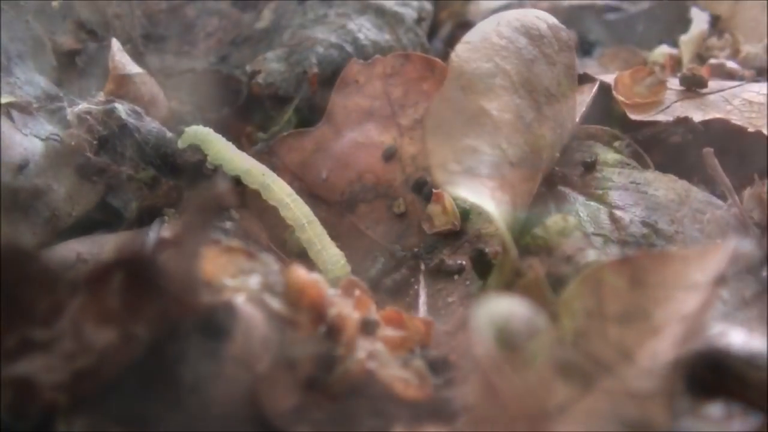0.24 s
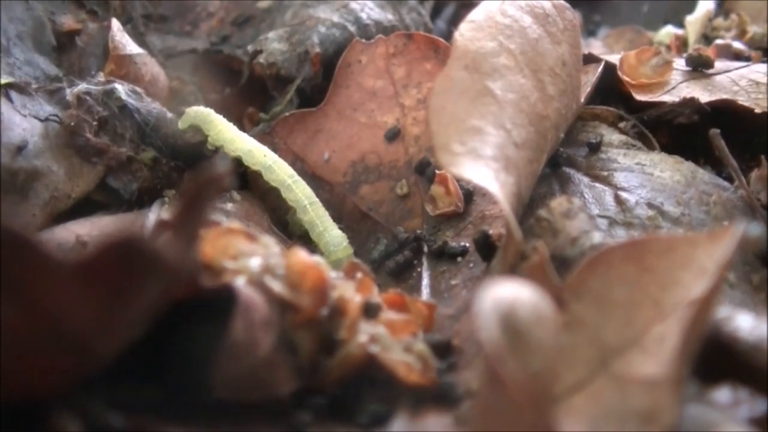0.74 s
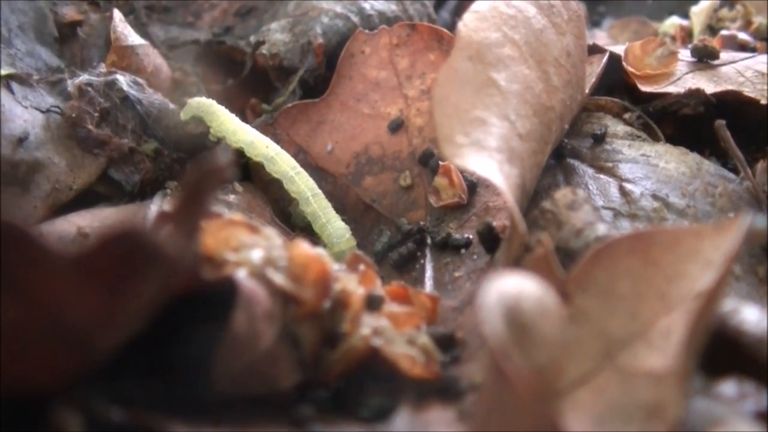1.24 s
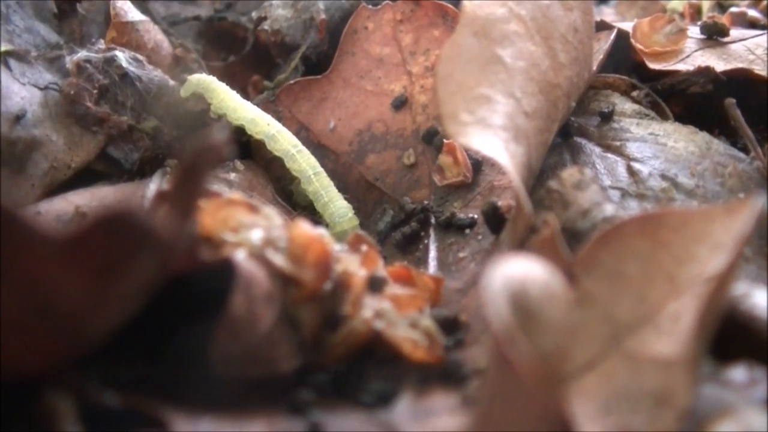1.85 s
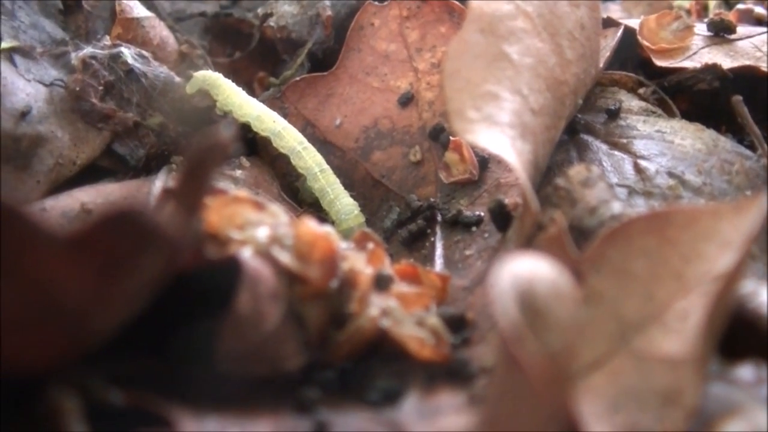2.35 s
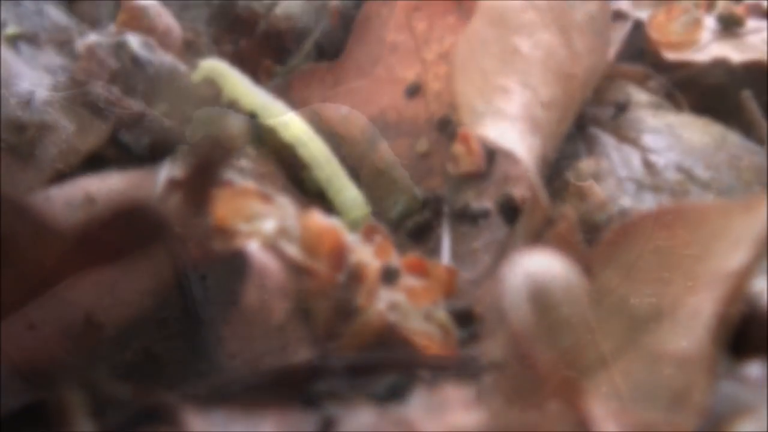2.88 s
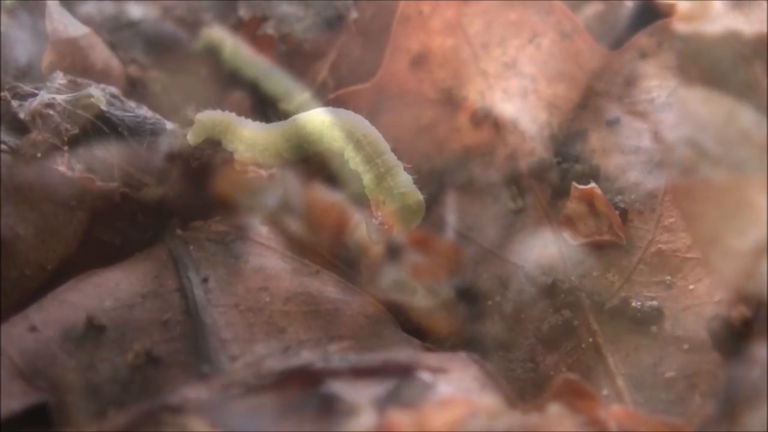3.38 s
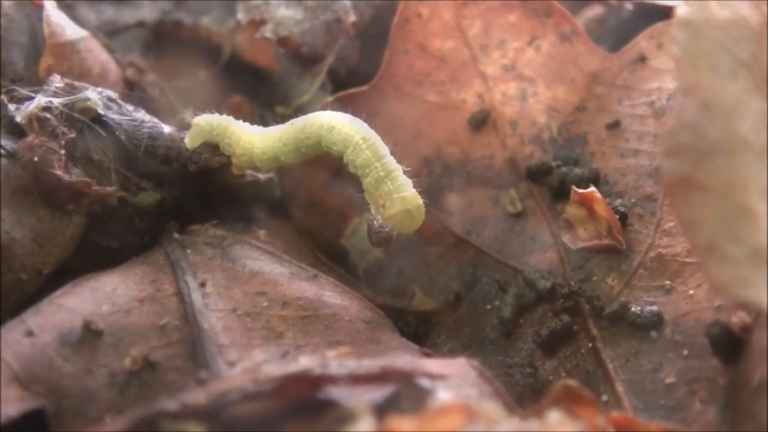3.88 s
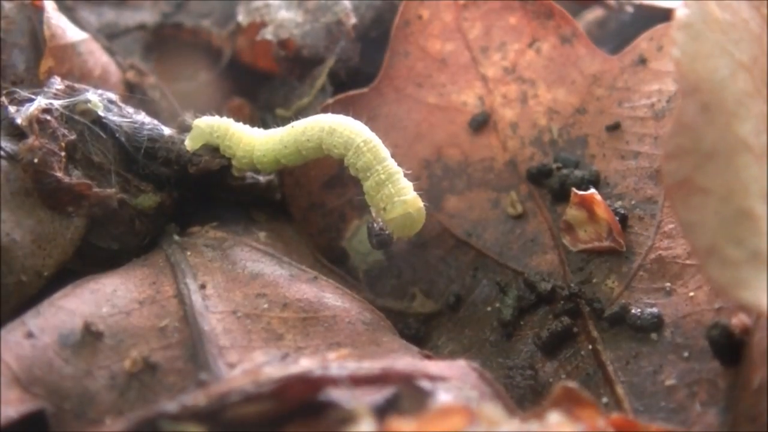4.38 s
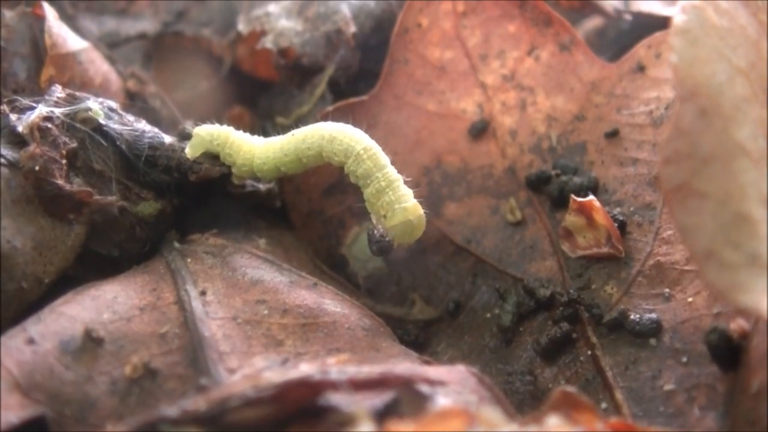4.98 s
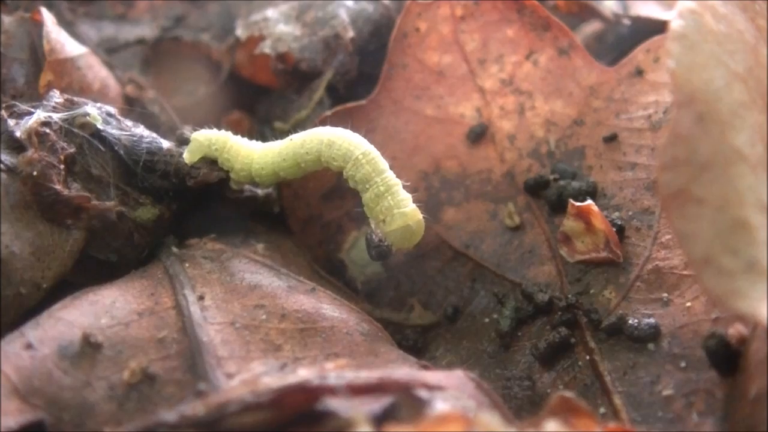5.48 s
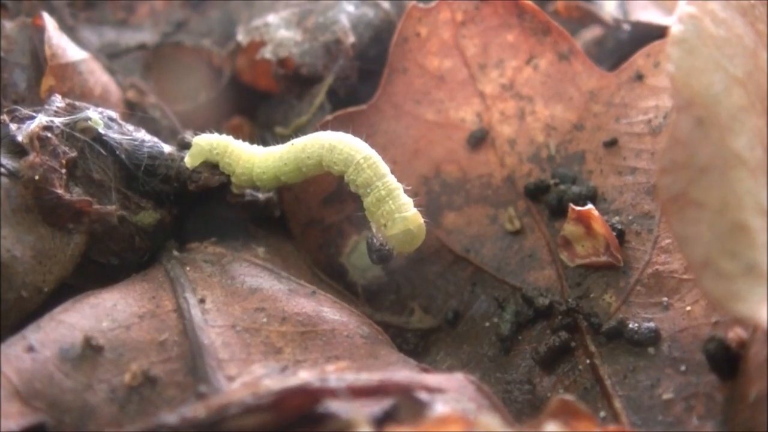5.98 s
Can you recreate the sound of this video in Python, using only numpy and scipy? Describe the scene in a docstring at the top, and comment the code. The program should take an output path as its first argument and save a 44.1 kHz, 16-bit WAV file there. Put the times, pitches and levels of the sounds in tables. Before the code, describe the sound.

Close, crisp ticks and snaps dot a quiet forest floor as small pellets land on dead leaves. They come several a second at first, peak in a few loud cracks midway, and grow sparse toward the end. Behind them are a light patter, a faint leafy rustle and distant birds, whose brief high chirps and whistles echo softly among the trees.

```python
"""Caterpillar droppings on dry leaves

Pellets fall from the canopy and tick on the leaf litter close to a camera microphone. Each rings
one leaf for a few milliseconds; the nearest overload the input. Farther off, a bird repeats a thin
call and others whistle, smeared by the forest, over a faint rustle."""
import sys
import numpy as np
from scipy import signal
from scipy.fft import rfft, irfft
from scipy.io import wavfile
from scipy.ndimage import uniform_filter1d

SR = 44100
rng = np.random.default_rng(int(sys.argv[2]) if len(sys.argv) > 2 else 0)


def master(y):
    """Save y as 16-bit WAV."""
    cut = np.clip(np.atleast_2d(y).T, -1, 1)
    pcm = np.round(cut * 32767)  # scale
    wavfile.write(sys.argv[1], SR, pcm.astype(np.int16))


N = 274729
TIME = np.arange(N) / SR

# how much the litter stirs, riding the rustle, far patter and crackle: t/s, level/dB
LITTER_STIR = [(0, -56), (.6, -52.5), (.85, -53), (.875, -60.5), (1.1, -60.5), (1.3, -55.5), (2.05, -55.5),
               (2.42, -61.5), (2.52, -56), (2.63, -53.5), (2.69, -58), (2.78, -50), (3.2, -54), (3.95, -50),
               (4.22, -52), (4.3, -57.5), (5.1, -61), (6.23, -60.5)]


def near_pellets(crunch_max_s=0.0021, punch_db=8, size=256):
    """A pellet strikes the modes of one leaf: light ones crunch first, hard ones punch straight through."""
    # hits: t/s, strength/dB, leaf ring f/Hz, ring Q, curl/dB, flex/dB, crack/dB, left-right/dB
    # (curl, flex and crack are relative to the ring)
    hits = [(.286, -9, 5970, 5.5, -13, -34, -29, 0), (.3215, -16.5, 6500, 1.5, 8.5, -8, 6, 5),
            (0.3283, -0.5, 4430, 2.2, 2, -15.5, -4, 2.5), (0.4143, -6.5, 4000, 2.4, -8, -34, -3.5, 1),
            (.5361, -8.5, 3640, 1.24, -15, -14, -16, -2), (0.6206, 2, 3530, 3.7, -8.5, -38, -22, 0),
            (0.7, -13, 6700, 0.69, -16, -13, -6, 2), (0.7535, -3, 4500, 2.6, 2, -6, -8, -3.5),
            (1.1363, -10, 5500, 4.5, 10, -5.5, -21, 5), (1.168, -18, 6490, 0.97, -22, -5, 2, -2),
            (1.1784, -4.5, 3860, 3.4, -12, -27, -31, 0), (1.216, -7, 6200, 5.3, -6, -25, -6.5, -2),
            (1.2386, -6.5, 3450, 1.9, 5, -10.5, -28, 8), (1.2714, -8, 5150, 4.2, 7, -9, -28, 6),
            (1.4197, 4.5, 5000, 3.2, 1.5, -14.5, -27, 6), (1.4805, 2, 5130, 2.2, -5.5, -14, -32, 4),
            (1.6047, -7.5, 5530, 4, -1.5, -8.5, -6.5, -1), (1.6907, -12, 3720, 1.8, -1, -6.5, -2, -3),
            (1.7344, -11, 5400, 0.62, -15, -31, -31, 1), (1.8422, -4.5, 6350, 2.3, -2.5, -21, -2.5, 1.5),
            (1.8574, -6.5, 5730, 1.2, 1, -10.5, -19, -3), (1.8783, -14, 6600, 0.67, -16, -23, -26, -2),
            (1.923, -11, 4180, 1.6, 2, -13, 2, -2.5), (1.9705, 12, 2800, 1.02, -1.5, -18.5, -0.5, -1.5),
            (2.0299, 0.5, 3740, 0.83, 0, -7.5, -5, -3.5), (2.061, -10, 4670, 0.98, -16, -24, -28, 3),
            (2.506, -2.5, 4040, 0.67, -19, -22, -36, .5), (2.5261, -6, 8140, 1.3, -9, -22, -10, -1),
            (2.59, -6, 4070, 3.8, -11, -20, -11, 1), (2.6482, -9, 4180, 4.5, -15, -13, -9.5, 3),
            (2.8013, 18, 4140, 1.7, -6, -5.5, -4.5, 0.5), (2.863, 2, 2800, 0.39, -17, -0.5, 4, 1.5),
            (2.8906, 22, 4330, 2.94, -6, -9, -12.5, 1), (2.9298, -3, 8300, 2.1, -12, -27, -25, -5),
            (3.0408, -4, 4640, 2.3, 0, -16, -33, 2), (3.1011, -2.5, 5950, 1.4, -6, -5.5, 0, -2.5),
            (3.105, -4.5, 5950, 1.35, 2.5, 7, 2.5, -2.5), (3.1745, -8.5, 6400, 0.99, -6.5, -5, -32, -3),
            (3.3483, -6.5, 3350, 2.4, 6, -15, -14.5, -1), (3.5326, 24, 4420, 3.6, -9, -10, -21.5, 1),
            (3.5755, 8, 4850, 2.5, -14, -5.5, -37, 0.5), (3.6024, -6.5, 5460, 4.7, -10, -12, -14, -4),
            (3.7114, 5.5, 4400, 2.3, -6.5, -5.5, -38, -1), (3.7234, 13, 4200, 4.3, -10, -12, -25, 1),
            (3.7689, -16.5, 5010, 3.5, 3, 9, -11, -1), (3.8902, -14, 3040, 2.6, 2, 1.5, 2, -3),
            (3.9595, -3.5, 7500, 1.1, -5.5, -25, -26, 1), (3.9905, -11.5, 3200, 1.3, -13, -2, -28, -2),
            (4.0193, -9, 4630, 0.67, -6, -3, -31, 3), (4.182, -5, 6160, 1.5, -4, -7, -42, 0),
            (4.284, -20.5, 4400, 1.6, -7, 14, -6, 0), (4.7657, -10, 5570, 4, -8.5, -9, -27, 2),
            (4.864, -3, 3900, 1.66, -27, -15, -17.5, 0), (5.331, -12.5, 4230, 2.6, -16, -20, -5.5, -1),
            (5.4052, -11.5, 3700, 3.3, -7, -5, -25, -2), (5.7611, 7.5, 3210, 2.2, -22, -16, -11, .5),
            (5.8211, 3, 3700, 1.8, -6.5, -2, -8, 1.5), (6.1198, -18, 5700, .76, -18, -14, 4.5, -1)]
    curl, flex = mode(hz=2374, q=1.92), mode(hz=733, q=0.77)  # modes that all leaves share
    crack, snap = mode(hz=9370, q=4), mode(hz=13400, q=4)
    soft_contact = signal.butter(2, (170, 10500), "bandpass", fs=SR, output="sos")  # soft pellet, small leaf
    lead_s = np.arange(size)[::-1] / SR  # time left until the blow
    out = np.zeros((2, N))
    for start, db, ring_hz, q, curl_db, flex_db, crack_db, pan_db in hits:
        leaf = mode(ring_hz, q) + amp(curl_db) * curl - amp(flex_db) * flex  # blade swings against curl
        leaf = signal.sosfilt(soft_contact, leaf) + amp(crack_db) * crack
        leaf += amp(crack_db - 19.5 + 0.99 * (db + flex_db)) * snap  # harder blows are shorter, so brighter
        crunch_s = crunch_max_s / (1 + amp(db - punch_db))
        blow = 35 * crunch_s * rng.standard_normal(size) * (lead_s < crunch_s)  # longer crunch, more weight
        blow[-1] = 1
        tick = signal.fftconvolve(leaf, blow / np.linalg.norm(blow))
        tick = among_leaves(tick, near_db=-10.5, near_t60=0.0089, far_db=-17.5, far_t60=0.043)
        add(out, start - lead_s[0], amp(db) * panned(tick, pan_db))
    return out


def far_patter(per_s=85, relative_db=-8.5, leaves=24):
    """Far pellets on many different leaves, dulled by distance, louder where the litter stirs."""
    out = np.zeros((2, N))
    for pitch, body, side in rng.random((leaves, 3)):
        leaf = mode(hz=2900 * 2.1 ** pitch, q=3.0) + 0.28 * body * mode(hz=900 * 2.5 ** body, q=1.5)
        tick = among_leaves(leaf, near_db=-14, near_t60=0.008, far_db=-10, far_t60=0.05)
        out += sprinkle(panned(tick, db=8 * (side - 0.5)), per_s / leaves, spread_db=6)
    return amp(relative_db) * unit(out) * envelope(LITTER_STIR)


def crackle(per_s=40, relative_db=-14.5):
    """Tiny brittle snaps, crowding together where the litter stirs most."""
    stir = envelope(LITTER_STIR)
    snap = among_leaves(mode(hz=9400, q=2.8), near_db=-9, near_t60=0.0069, far_db=-14, far_t60=0.05)
    snaps = sprinkle(snap, per_s * unit(stir), spread_db=5.5)
    return amp(relative_db) * unit(snaps) * stir


def settling_leaves():
    """Loose leaves settle with soft, low knocks."""
    # knocks: t/s, level/dB, f/Hz
    knocks = [(0.633, -13, 304), (.84, -9.5, 200), (2.518, -11, 328), (2.589, -9.5, 265), (2.65, -7.5, 255),
              (3.878, -13.5, 220), (4.227, -7, 413), (4.414, -12, 332), (4.581, -10, 380), (5.336, -9, 260),
              (5.431, -10, 350)]
    muffle = signal.butter(4, 650, fs=SR, output="sos")
    out = np.zeros((2, N))
    for start, db, hz in knocks:
        knock = signal.sosfilt(muffle, mode(hz, q=0.42))
        add(out, start, amp(db) * among_leaves(knock, near_db=-5, near_t60=0.11, far_db=0, far_t60=0.055))
    return out


def calling_bird():
    """A thin, raspy tone flicks up and slides down, with faint partials at 0.5 and 1.5 times its pitch."""
    # calls: t/s, level/dB, top f/Hz
    calls = [(.178, -44, 4723), (1.247, -43.5, 4900), (2.235, -44, 4894), (2.28, -49.5, 4905),
             (2.845, -47, 4750), (2.93, -43, 4797), (3.763, -49.5, 4660), (3.815, -45.5, 4970),
             (3.9, -44, 4920), (4.475, -45.5, 4936), (5.556, -42.5, 4970)]
    # pitch arch of one call: t/s, share of the top pitch
    arch_points = [(0, .83), (.005, .96), (.01, 1), (.018, .99), (.025, .93), (.033, .82), (.042, .62)]
    t = np.arange(0, arch_points[-1][0], 1 / SR)
    arch = np.interp(t, *np.transpose(arch_points))
    swell = arch ** 2 * signal.windows.tukey(len(t), 0.2)  # loudest at the top of the arch
    voice = np.zeros(N)
    for start, db, top_hz in calls:
        rasp = 0.036 * abs(waver(len(t), size=45))  # quick, uneven sags in pitch
        phase = 2 * np.pi * np.cumsum(top_hz * arch * (1.035 - rasp)) / SR
        partials = amp(-17.5) * np.sin(0.5 * phase) + amp(-16) * np.sin(1.5 * phase)
        tone = np.sin(phase) + partials * waver(len(t), size=70)
        add(voice, start, amp(db) * unit(tone * swell))
    return forest_reverb(voice, direct_db=-9)


def whistling_birds(held_buzz=0.0017, buzz_per_slide=0.26):
    """Glides from deep among the trees: held notes are pure, slurred ones buzz."""
    # notes: t/s, length/s, start f/Hz, end f/Hz, level/dB
    notes = [(0, 0.028, 4030, 3730, -54), (0, 0.25, 3364, 3442, -61.5), (.08, 0.069, 7930, 7380, -61.5),
             (0.391, 0.11, 3396, 3320, -55.5), (.413, .17, 5200, 4850, -62.5), (.6, .067, 4580, 4480, -57),
             (.667, 0.058, 3456, 3336, -51.5), (0.902, 0.024, 5140, 5090, -54.5),
             (1.026, .11, 3380, 3600, -66), (1.18, 0.18, 3100, 3267, -57.5), (3.15, 0.13, 4530, 4770, -54),
             (3.279, 0.03, 3430, 3370, -51), (3.31, 0.13, 4820, 3630, -55), (3.875, 0.1, 3640, 3663, -52),
             (4.06, 0.057, 3652, 3656, -52), (4.098, 0.037, 3287, 3215, -51.5),
             (4.203, .095, 6740, 7100, -63.5), (4.227, .043, 2737, 2550, -61),
             (4.344, 0.12, 4080, 3840, -63.5), (4.514, 0.1, 7100, 6470, -58.5),
             (4.926, 0.089, 4080, 3760, -63.5), (5.051, 0.063, 3410, 3230, -65.5),
             (5.122, 0.19, 2907, 2880, -69.5), (5.659, .27, 3456, 3490, -64.5),
             (5.983, 0.06, 3420, 3125, -60.5)]
    voice = np.zeros(N)
    for start, length_s, start_hz, end_hz, db in notes:
        length = round(length_s * SR)
        buzz = held_buzz + buzz_per_slide * abs(end_hz / start_hz - 1)
        wobble = waver(length, size=90) + waver(length, size=400)
        hz = np.linspace(start_hz, end_hz, length) * (1 + buzz * wobble)
        husky_flutter = 1 + 0.4 * waver(length, size=60)
        note = np.sin(2 * np.pi * np.cumsum(hz) / SR) * husky_flutter
        add(voice, start, amp(db) * unit(note * signal.windows.tukey(length, 0.3)))
    return forest_reverb(voice, direct_db=-6, decay_speed=1.47)


def rustle(flicker_db=3):
    """The stirring litter gives a faint, flickering wash."""
    # colour of the rustle: f/Hz, density/dB
    colour = [(60, -11), (200, 9), (500, 6.5), (1200, 1), (2500, 0.5), (4500, 2), (7000, -3.5),
              (10000, -11.5), (12500, -19), (16000, -26)]
    return stereo_noise(colour) * envelope(LITTER_STIR) * amp(flicker_db * waver(N, size=300))


def hiss(peak_s=0.856, peak_db=-40.5, swell_db_per_s=164, cut_db_per_s=4400):
    """One bright hiss swells and stops short."""
    # colour of the hiss: f/Hz, density/dB
    colour = [(200, -1), (1500, -1), (4200, 12), (7000, 1), (10500, 3.5), (12200, -5), (16000, -20)]
    since = TIME - peak_s
    return stereo_noise(colour) * amp(peak_db + np.minimum(swell_db_per_s * since, -cut_db_per_s * since))


def still_air(db=-59.5):
    """A steady, quiet bed of forest air."""
    # colour of the air: f/Hz, density/dB
    colour = [(18, -29), (30, -32), (95, 2), (287, 9.5), (512, 6.5), (1500, -4), (2480, -7.5), (3310, 0.5),
              (3980, -2), (7270, -22), (8080, -17), (8740, -9.5), (14800, -13), (16000, -29)]
    return amp(db) * stereo_noise(colour)


def camera_whine(hz=7800, db=-69):
    """The camera gives off one thin, steady tone."""
    return amp(db) * unit(np.sin(2 * np.pi * hz * TIME))


def among_leaves(tick, near_db, near_t60, far_db, far_t60):
    """Neighbouring leaves throw a tick back at once; the litter around adds a short tail."""
    near = np.roll(scatter(near_t60), round(0.0005 * SR), axis=1)
    paths = amp(near_db) * near + amp(far_db) * scatter(far_t60)
    paths[:, 0] += 1  # the direct sound
    return signal.fftconvolve(tick[None], paths, axes=1)


def forest_reverb(voice, direct_db, decay_speed=1.0):
    """Trunks and foliage return a long diffuse tail, each band dying at its own speed."""
    # decay of the forest: f/Hz, t60/s at decay_speed 1
    decay_times = [(500, 0.11), (3200, 1), (4900, 0.83), (9000, 0.36)]
    hz, t, bands = signal.stft(rng.standard_normal((3, SR)), SR, nperseg=256)
    fade = amp(-60 * decay_speed * t / at_hz(decay_times, hz)[:, None])
    tails = signal.istft(bands * fade, SR, nperseg=256)[1]
    tails = tails[:2] + 2.9 * tails[2]  # mostly the same echoes reach both ears
    tails /= np.linalg.norm(tails, axis=1, keepdims=True)
    return amp(direct_db) * voice + signal.fftconvolve(voice[None], tails, axes=1)[:, :N]


def scatter(t60, size=4096):
    """A short stereo spray of reflections, of energy 1 a side."""
    spray = rng.standard_normal((2, size)) * amp(-60 * np.arange(size) / SR / t60)
    return spray / np.linalg.norm(spray, axis=1, keepdims=True)


def mode(hz, q, size=2048):
    """The ping of a heavily damped resonance, applied twice for a soft start and steep skirts."""
    f = np.fft.rfftfreq(size, 1 / SR) + 1
    return irfft(1 / (1 + 1j * q * (f / hz - hz / f)) ** 2)


def sprinkle(tick, per_s, spread_db):
    """Triggers a stereo tick at random times, mostly softly, now and then harder."""
    triggers = rng.random(N) < per_s / SR
    strength = amp(spread_db * np.minimum(rng.exponential(1, N), 3))
    return signal.oaconvolve((triggers * strength)[None], tick, axes=1)[:, :N]


def stereo_noise(colour):
    """Coloured noise, wide in the low mids and centred in the treble."""
    # stereo image: f/Hz, left-right correlation
    likeness = [(40, 0.034), (150, -0.53), (300, -0.61), (600, -0.69), (1200, -0.39), (3000, .55),
                (8000, 0.97), (15000, 1)]
    hz = np.fft.rfftfreq(N, 1 / SR)
    left, other = rfft(rng.standard_normal((2, N)))
    same = np.clip(at_hz(likeness, hz), -1, 1)
    right = same * left + np.sqrt(1 - same ** 2) * other
    return unit(irfft(np.array([left, right]) * amp(at_hz(colour, hz)), N))


def waver(length, size):
    """Random wobble of rms 1, smoothed over size samples."""
    return unit(uniform_filter1d(rng.standard_normal(length), size=size))


def amp(db):
    """Decibels to gain."""
    return 10 ** (np.asarray(db) / 20)


def unit(x):
    """Scales to rms 1."""
    return x / np.sqrt(np.mean(x ** 2) + 1e-20)


def at_hz(points, hz):
    """Reads a curve on a log-frequency axis."""
    f, value = np.transpose(points)
    return np.interp(np.log(hz + 1), np.log(f), value)


def envelope(curve):
    """A fader ride (t/s, level/dB) as a gain for each sample."""
    return amp(np.interp(TIME, *np.transpose(curve)))


def panned(x, db):
    """Places a sound by its left-right level difference."""
    return x * amp([[db / 2], [-db / 2]])


def add(mix, start_s, sound):
    """Mixes a sound in at start_s."""
    part = mix[..., max(round(start_s * SR), 0):][..., :sound.shape[-1]]
    part += sound[..., :part.shape[-1]]


def scene():
    """Ticking leaves in front, birds behind them, a quiet bed underneath."""
    leaves = near_pellets() + far_patter() + crackle() + settling_leaves()
    birds = calling_bird() + whistling_birds()
    bed = rustle() + hiss() + still_air() + camera_whine()
    return leaves + birds + bed


def record(dry, ceiling=0.95, cutoff_hz=16700):
    """The nearest ticks overload the input; a steep low-pass trims the very top."""
    clipped = np.clip(dry, -ceiling, ceiling)
    lowpass = signal.firwin(255, cutoff_hz, window=("kaiser", 9), fs=SR)
    return signal.oaconvolve(clipped, lowpass[None], "same", axes=1)


dry = scene()
out = record(dry)
master(out)
```